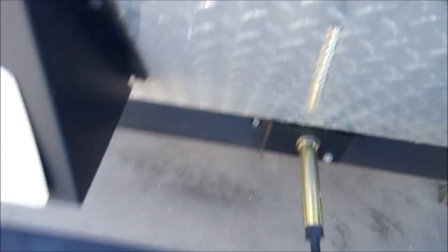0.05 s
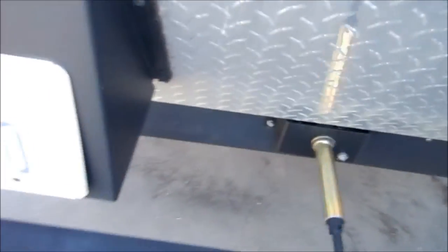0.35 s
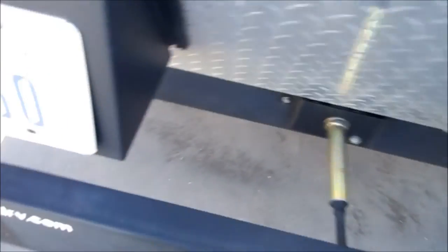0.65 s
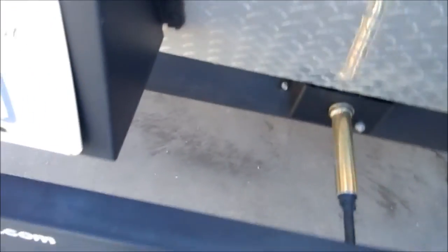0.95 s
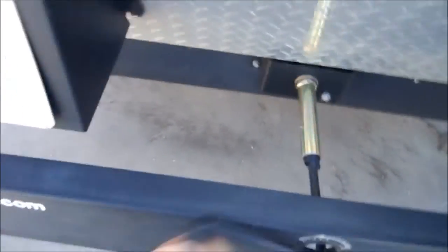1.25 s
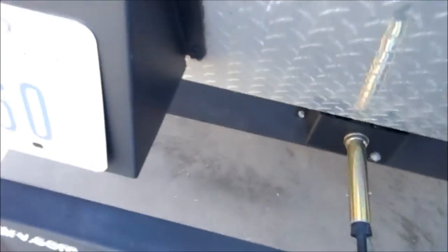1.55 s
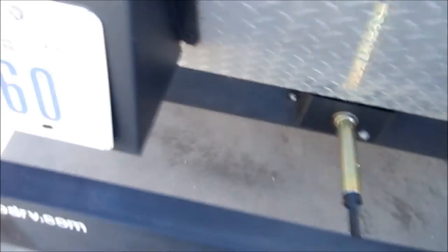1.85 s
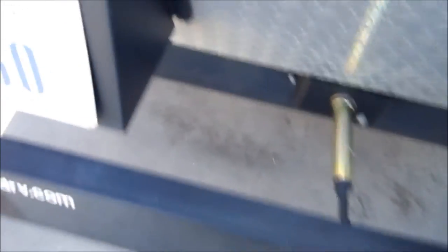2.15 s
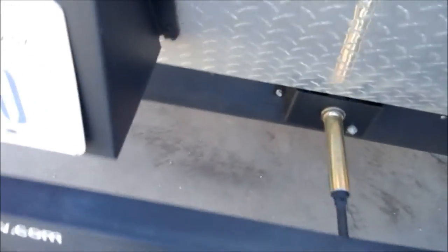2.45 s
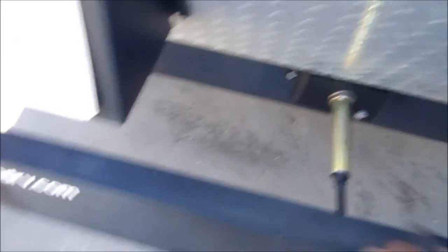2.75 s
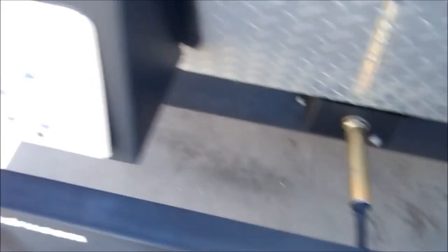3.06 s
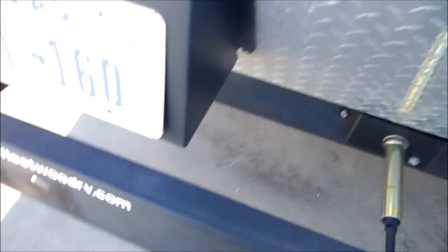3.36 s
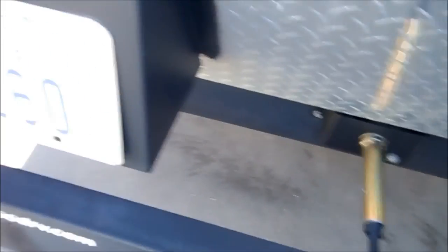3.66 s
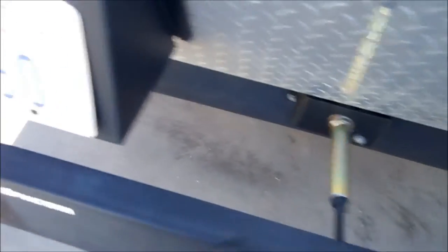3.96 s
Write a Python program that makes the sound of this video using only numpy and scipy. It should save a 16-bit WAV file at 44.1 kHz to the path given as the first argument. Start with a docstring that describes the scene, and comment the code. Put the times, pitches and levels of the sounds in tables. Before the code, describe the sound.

Rapid, ringing metal ratchet clicks quicken and slow in cycles, close by outdoors.

```python
"""A steel ratchet is cranked by hand on a tread-plate platform outdoors, close to a phone.
From the start, the catch (pawl) ticks over each tooth, snaps down and chatters, so catch, gear and
frame ring. In the first second the crank knocks twice; near 0.8 s and 1.6 s air thumps the microphone.
To the end, the clicks and the gear's rubbing speed up and slow with each turn, over faint outdoor noise."""
import sys
import numpy as np
from scipy import signal
from scipy.fft import rfft, irfft
from scipy.io import wavfile

SR = 44100
rng = np.random.default_rng(int(sys.argv[2]) if len(sys.argv) > 2 else 0)


def pcm_store(signal):
    """Save signal as 16-bit PCM."""
    levels = np.round(np.clip(np.atleast_2d(signal), -1, 1) * 32767)
    wavfile.write(sys.argv[1], SR, levels.astype(np.int16).T)


N = 176400
SIDES = np.array([[.5], [-.5]])  # splits a difference between left and right
USUAL_RATE = 22  # teeth per second

# Ringing notes of frame and gear: f/Hz, level/dB, time to fade by 60 dB/s
FRAME_NOTES = [(853, -26, .3), (935, -23.5, .2), (1196, -31, .2), (1686, -25, .22), (2024, -28, .3),
               (2578, -14.5, .3), (3110, -25, .15), (3473, -25, .2), (3744, -22, .2), (4327, -25, .18),
               (4593, -21, .16), (4894, -23, .15)]
# Ringing notes of the catch: f/Hz, level/dB, time to fade by 60 dB/s
CATCH_NOTES = [(6680, -20, .1), (6850, -21, .07), (7786, -22, .09), (9970, -22, .07), (12270, -16, .06),
               (12350, -14, .08), (12470, -14, .06), (12570, -16, .06), (13330, -23, .05)]
# One snap per tooth: t/s, tick's head start/ms, level/dB, treble boost/dB, low boost/dB, chatter/dB
TEETH = [(0.0126, 3.7, -22.3, -0.1, 1.7, -2.0), (0.0848, 4.0, -22.9, -1.3, -0.5, -3.8),
         (0.182, 5.2, -23.5, 1.8, -1.7, -4.5), (0.2504, 4.0, -21.4, 0.7, -0.5, -2.9),
         (0.2978, 3.7, -20.4, -2.1, -2.9, -0.1), (0.3428, 4.4, -22.0, -1.0, -1.0, -1.2),
         (0.3851, 3.3, -21.9, -4.6, -1.7, 0.2), (0.4258, 3.2, -22.6, -3.2, 1.1, 1.9),
         (0.4649, 2.8, -22.9, -2.4, -0.5, 0.7), (0.5039, 2.9, -21.3, -2.7, 0.7, -1.4),
         (0.5422, 2.6, -24.0, -2.1, 0.7, -2.3), (0.5846, 2.0, -24.2, -2.5, 0.4, 4.8),
         (0.6338, 3.1, -25.4, 1.7, 3.7, -1.4), (0.6827, 3.2, -27.1, 4.9, 6.0, 0.4),
         (0.7364, 5.3, -22.7, -1.7, 0.5, -2.3), (0.7888, 4.4, -25.4, 2.9, 0.8, -1.7),
         (0.8474, 5.0, -25.0, -0.9, 1.5, 0.1), (0.9215, 5.5, -24.9, 5.7, -0.2, 0.8),
         (0.9811, 4.9, -23.0, 3.6, -0.6, -0.7), (1.031, 3.9, -24.0, -0.9, 0.5, 1.3),
         (1.0781, 4.5, -22.2, 2.1, -0.3, 4.7), (1.122, 3.6, -21.9, -2.9, -1.2, 1.4),
         (1.1597, 2.7, -23.4, -0.5, -0.0, 4.8), (1.2029, 3.2, -21.4, -0.6, -0.6, -0.7),
         (1.2405, 2.6, -21.6, -2.3, -0.9, -4.1), (1.2763, 4.5, -23.7, 0.5, 1.2, -1.1),
         (1.3127, 2.0, -24.7, -0.5, -0.1, 1.3), (1.3568, 3.2, -26.0, 0.8, 5.2, -3.8),
         (1.4049, 3.2, -27.9, 2.4, 3.0, -3.6), (1.4636, 5.1, -29.2, 1.5, 2.4, 0.8),
         (1.5242, 5.6, -27.4, 3.2, 1.8, 0.3), (1.5855, 5.3, -24.7, -0.5, 0.7, 0.0),
         (1.6546, 5.0, -28.0, 3.6, -0.2, 1.6), (1.7149, 4.3, -23.2, -0.8, -2.0, -1.5),
         (1.7653, 3.3, -23.9, -2.7, 0.7, -1.1), (1.8047, 2.0, -20.7, -2.2, -0.5, 4.8),
         (1.8478, 3.6, -21.2, -2.4, -1.7, -0.2), (1.8871, 4.4, -23.4, 1.1, 0.4, 0.6),
         (1.9224, 2.3, -23.5, -2.4, 0.3, 0.5), (1.9572, 2.8, -23.8, -3.2, 0.8, -1.9),
         (1.9883, 2.0, -24.0, -2.1, 1.3, 3.9), (2.0242, 2.2, -24.4, -0.7, 0.1, -0.7),
         (2.0641, 2.5, -25.4, -1.3, 1.3, 2.1), (2.1072, 3.1, -25.0, 2.1, 1.0, -3.0),
         (2.1536, 4.3, -25.7, -0.3, 1.1, -0.4), (2.2035, 3.9, -27.8, 4.6, 1.7, -1.6),
         (2.2591, 4.5, -26.0, -0.3, -0.1, -1.4), (2.3272, 5.2, -27.9, 3.7, 0.2, 2.7),
         (2.3871, 4.1, -22.9, 0.9, -4.5, 1.4), (2.4347, 4.1, -23.7, -2.0, -0.3, 0.5),
         (2.48, 4.0, -20.5, -4.5, -1.5, 0.6), (2.5235, 3.8, -21.5, -1.9, -1.1, -0.6),
         (2.5635, 4.3, -21.6, 1.1, -2.1, 1.5), (2.5998, 2.6, -20.7, -3.4, -0.1, -0.2),
         (2.6327, 2.3, -23.8, 2.0, 0.2, 4.7), (2.6644, 2.0, -23.3, -2.0, 0.5, 2.3),
         (2.6999, 2.7, -23.9, -1.1, 0.8, -0.7), (2.7394, 3.2, -27.2, 2.2, 4.0, -1.6),
         (2.7799, 2.3, -25.2, 1.5, 1.2, -1.5), (2.8248, 3.6, -25.8, -0.8, 0.0, -1.5),
         (2.8715, 3.7, -28.0, 3.7, 1.7, -3.9), (2.9201, 4.0, -24.8, -0.9, -1.1, -1.2),
         (2.9795, 4.8, -26.7, 2.0, -0.7, -1.7), (3.0432, 3.9, -26.1, 2.7, 0.5, -1.5),
         (3.0925, 3.0, -24.1, 1.1, -1.5, -0.9), (3.1384, 4.4, -21.7, -1.6, -1.8, 3.1),
         (3.182, 3.4, -21.4, -3.3, -1.3, 1.0), (3.2245, 4.4, -21.8, 1.8, 0.6, -1.7),
         (3.2639, 2.6, -21.8, -2.0, -0.3, -0.4), (3.3, 2.9, -23.0, 0.0, -1.4, -1.7),
         (3.3324, 3.2, -23.5, 0.2, -1.1, 1.0), (3.3652, 2.5, -22.8, -1.8, 0.1, 1.5),
         (3.4037, 2.1, -25.8, 1.8, 1.4, 0.8), (3.4471, 3.4, -26.1, 2.6, 3.0, -0.5),
         (3.4939, 5.9, -25.6, 0.2, -0.6, -1.0), (3.545, 4.3, -27.5, 2.9, -0.2, 0.8),
         (3.595, 4.4, -23.5, 0.5, -1.2, 2.0), (3.6523, 3.3, -27.8, 4.3, 0.1, 1.9),
         (3.7118, 3.3, -26.0, 2.1, -0.2, -4.1), (3.7595, 3.2, -23.0, -1.2, -2.3, -0.2),
         (3.8012, 4.0, -21.3, 2.7, -0.9, 4.8), (3.84, 2.0, -21.1, -1.9, -1.3, -0.5),
         (3.8781, 3.6, -22.5, -1.9, -2.4, -0.9), (3.9143, 3.7, -22.3, -3.3, -1.0, 0.0),
         (3.9494, 2.2, -21.9, 0.2, 1.4, 0.6), (3.981, 3.4, -22.8, -2.3, 1.0, -0.8)]

def ratchet(size=8192, gain_db=30.5, same_share=.27):
    """Each fall of the catch rings the same steel parts; speed makes tick and frame louder."""
    out = np.zeros((2, N))
    t, hz = np.arange(size) / SR, np.fft.rfftfreq(size, 1 / SR)
    likeness, balance = microphone(hz)
    delay = np.exp(-2j * np.pi * np.outer([0, 6e-6], hz))  # the right side hears it a hair later
    treble, low = along(hz, [(9600, 0), (12000, 1)]), along(hz, [(1500, 1), (2700, 0)])
    same_noise = noise_pair(size, likeness)
    for snap_s, lead_ms, db, treble_db, low_db, chatter_db in TEETH:
        lead_s = lead_ms / 1000
        extra_rate = tooth_rate(snap_s) - USUAL_RATE
        hits = catch_fall(t, lead_s, tick_db=-5.5 + .4 * extra_rate, chatter_db=chatter_db - 2)
        noise = np.sqrt(same_share) * same_noise + np.sqrt(1 - same_share) * noise_pair(size, likeness)
        steel = steel_clang(noise, hits, hz)
        frame = undb(-5.5 + .32 * extra_rate) * ringing_notes(FRAME_NOTES, hits, t)
        catch = undb(-3) * ringing_notes(CATCH_NOTES, hits, t)
        tone = undb(gain_db + db + treble_db * treble + low_db * low)
        add(out, snap_s - lead_s, irfft((steel + frame + catch) * balance * delay * tone))
    return out

def tooth_rate(t):
    """Cranking speed in teeth per second."""
    times = np.array(TEETH)[:, 0]
    return np.interp(t, times, 1 / np.gradient(times))

def catch_fall(t, lead_s, tick_db, chatter_db, count=6, scuff_s=.0037, chatter_s=.008, fade_s=.0093):
    """Energy of the hits as the catch scuffs over a tooth's tip, then snaps down and bounces."""
    def spikes(times, sizes):
        return np.bincount((times * SR).astype(int), sizes ** 2 / np.sum(sizes ** 2), len(t))

    jitter, scuffs = rng.random((2, count))
    bounce_s = chatter_s * (np.arange(count) + .5 + jitter) / count
    bounce_sizes = undb(chatter_db + 2 * rng.standard_normal(count)) * np.exp(-bounce_s / fade_s)
    tick = spikes(scuff_s * np.r_[0, scuffs], np.r_[1, np.full(count, .5)]) * undb(tick_db) ** 2
    snap = spikes(lead_s + np.r_[0, bounce_s], np.r_[1, bounce_sizes])
    return tick, snap

# Tone of a snap in the steel: f/Hz, level/dB
STEEL_TONE = [(150, -20), (400, -12.5), (780, -5.8), (1300, -7.3), (2200, -3.2), (3100, -.3), (4800, .3),
              (5900, -2), (6800, .6), (9000, -1.6), (10800, -1.6), (12400, 2.8), (13400, 1.5), (14300, -7)]
# How long the steel rings: f/Hz, time to fade by 60 dB/s
STEEL_FADES = [(300, 0.23), (900, 0.18), (2000, 0.28), (3500, 0.15), (6000, 0.12), (9000, 0.099),
               (13000, 0.083)]

def steel_clang(noise, hits, hz, patches=130, patch_db=3):
    """Spectrum of the steel's many crowded notes, which die sooner in the treble."""
    clang = 0
    log_centres = np.log(np.array(STEEL_FADES)[:, 0])
    for weights, (centre_hz, ring_s) in zip(np.eye(len(log_centres)), STEEL_FADES):
        band = irfft(noise * np.interp(np.log(hz + 1), log_centres, weights))
        clang += band * ring_shape(hits, centre_hz, ring_s)
    # each tooth favours different pitches
    favour = np.interp(hz, np.linspace(0, SR / 2, patches), rng.standard_normal(patches))
    return rfft(clang) * undb(along(hz, STEEL_TONE) + patch_db * favour)

def ringing_notes(notes, hits, t, detune=.003, scatter_db=4, spread_rad=.88):
    """Spectrum of a part's clear notes, struck a little differently by each tooth."""
    out = np.zeros((2, len(t)))
    for hz, db, ring_s in notes:
        tune, start, spread, force = rng.standard_normal(4)
        phase = np.pi * start + spread_rad * spread * min(hz / CATCH_NOTES[0][0], 1) * SIDES
        wave = np.sqrt(2) * np.sin(2 * np.pi * hz * (1 + detune * tune) * t + phase)
        out += undb(db + scatter_db * force) * ring_shape(hits, hz, ring_s) * wave
    return rfft(out)

def ring_shape(hits, hz, ring_s, dull_hz=8850, crack_db=4.5, crack_s=.00096, rise_cycles=2.5):
    """A note's loudness over time: each hit adds energy, which cracks sharply and then dies away."""
    def fade(energy, seconds):
        return signal.lfilter([1], [1, -np.exp(-1 / (seconds * SR))], energy)

    tick, snap = hits
    push = snap + tick / (1 + (hz / dull_hz) ** 4)  # the tick is duller than the snap
    energy = fade(push, ring_s / np.log(1000) / 2) + undb(crack_db) ** 2 * fade(push, crack_s)
    energy = fade(energy, rise_cycles / hz)  # a note takes a moment to build up
    return np.sqrt(energy / energy.sum())

# Tone of the rubbing gear: f/Hz, level/dB
RUB_TONE = [(90, 4), (220, 6), (500, 3.5), (900, -1.5), (1300, -22.5), (2500, 0), (6000, -8), (14000, -23)]
# Dull knocks of the crank: t/s, level/dB
KNOCKS = [(.425, -43.5), (.672, -42)]

def crank(knock_hz=235, knock_octaves=.81, knock_fade_s=.056):
    """The gear rubs in its housing, louder as it turns faster, and the crank knocks twice."""
    t, hz = np.arange(N) / SR, np.fft.rfftfreq(N, 1 / SR)
    likeness, balance = microphone(hz)
    noise = noise_pair(N, likeness) * balance
    rub = irfft(noise * undb(along(hz, RUB_TONE)))
    rub_level = undb(-46 + .41 * (tooth_rate(t) - USUAL_RATE))
    knock = irfft(noise * np.exp(-(np.log2((hz + 1) / knock_hz) / knock_octaves) ** 2))
    knock_level = sum(undb(db) * (t >= s) * np.exp(-np.abs(t - s) / knock_fade_s) for s, db in KNOCKS)
    return rub / rub.std() * rub_level + knock / knock.std() * knock_level

# Puffs of air: t/s, f/Hz, peak level/dB, half length/s
PUFFS = [(.015, 95, -35, .009), (0.838, 77, -19.5, 0.005), (1.575, 47.4, -22, 0.0048)]

def air_puffs(right_db=-15.5):
    """Short puffs of air thump the microphone, mostly on the left."""
    t = np.arange(N) / SR
    puffs = sum(undb(db) * np.exp(-((t - s) / half_s) ** 2) * np.cos(2 * np.pi * hz * (t - s))
                for s, hz, db, half_s in PUFFS)
    return puffs * undb([[0], [right_db]])

# Tone of the outdoor noise: f/Hz, level/dB
OUTDOOR_TONE = [(20, 1), (35, 2), (80, -2), (150, -12.5), (300, -22.5), (600, -27.5), (900, -39),
                (1400, -31), (3000, -75), (7000, -41), (14000, -33)]

def outdoors(level_db=-43.5, sway_db=.6, left_over_right_db=4.5, sways=30):
    """Low rumble and faint hiss that sway a little in loudness."""
    sway = np.interp(np.arange(N), np.linspace(0, N, sways), rng.standard_normal(sways))
    hz = np.fft.rfftfreq(N, 1 / SR)
    air = irfft(noise_pair(N, likeness=.75) * undb(along(hz, OUTDOOR_TONE)))
    return air / air.std() * undb(level_db + sway_db * sway + left_over_right_db * SIDES)

# Sound at the microphone's two openings: f/Hz, left over right/dB, likeness (0 to 1)
OPENINGS = [(200, 6, .97), (700, 6.5, .96), (1400, 4.2, .92), (3000, 1.6, .72), (8000, .4, .6),
            (13000, 1.3, .56)]

def microphone(hz):
    """How alike left and right are at each pitch, and how strong each side is."""
    return along(hz, OPENINGS, column=2), undb(along(hz, OPENINGS) * SIDES)

def noise_pair(size, likeness):
    """Spectra of two partly alike white noises, left and right."""
    middle, side = rfft(rng.standard_normal((2, size)))
    return np.sqrt((1 + likeness) / 2) * middle + np.sqrt((1 - likeness) / 2) * side * 2 * SIDES

def undb(db):
    """Turn decibels into a multiplier."""
    return 10 ** (np.asarray(db) / 20)

def along(hz, table, column=1):
    """Read between a table's rows along a pitch scale."""
    table = np.array(table)
    return np.interp(np.log(hz + 1), np.log(table[:, 0]), table[:, column])

def add(out, start_s, sound):
    """Mix a sound in at a given time."""
    start = int(round(start_s * SR))
    first, end = max(start, 0), min(start + sound.shape[1], N)
    out[:, first:end] += sound[:, first - start:end - start]

def scene():
    """The ratchet in the open air."""
    return ratchet() + crank() + air_puffs() + outdoors()

def record(dry):
    """The phone cuts the treble above 13950 Hz."""
    return signal.sosfilt(signal.ellip(8, .2, 70, 13950, fs=SR, output="sos"), dry)

dry = scene()
out = record(dry)
pcm_store(out)
```